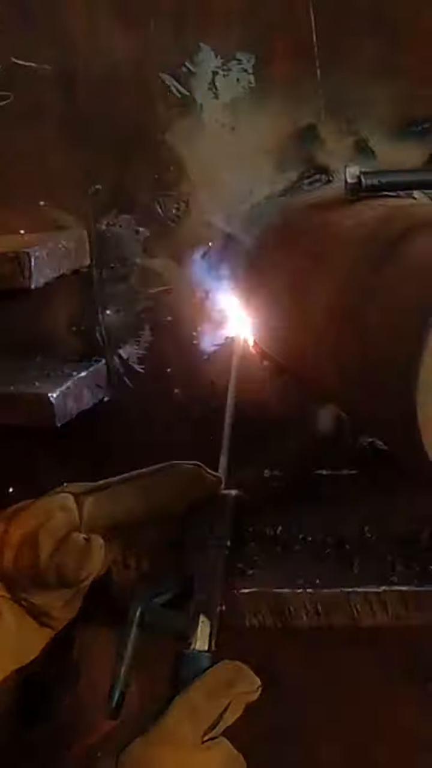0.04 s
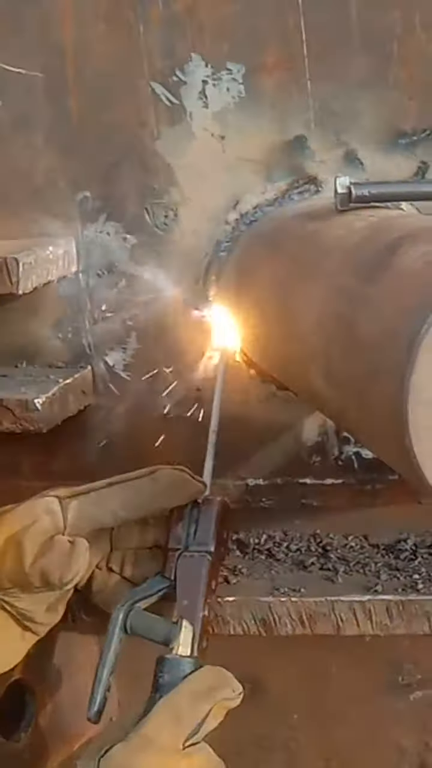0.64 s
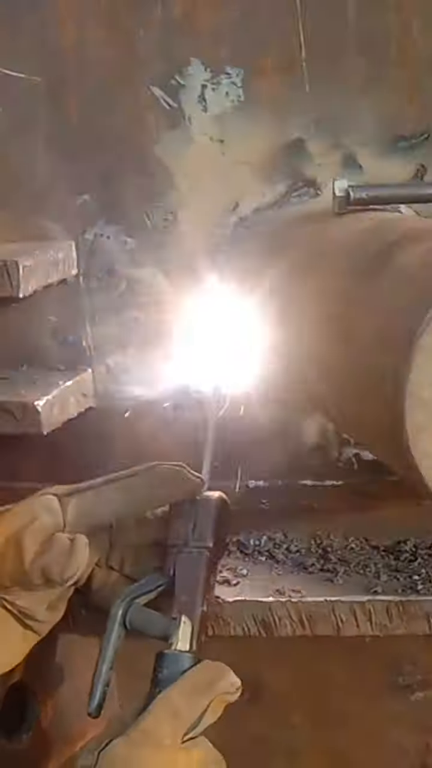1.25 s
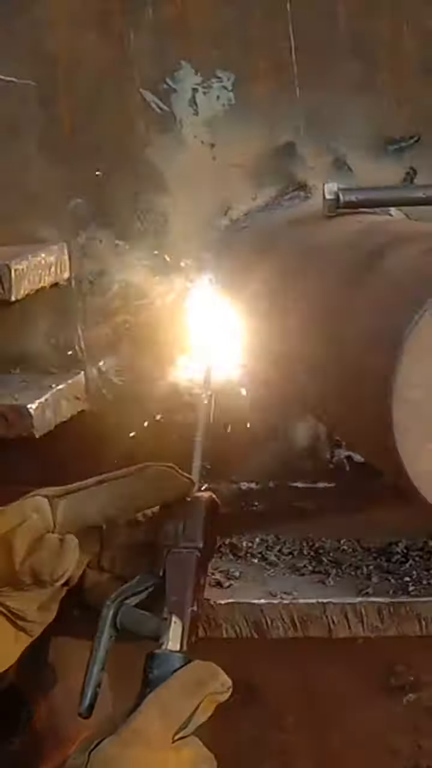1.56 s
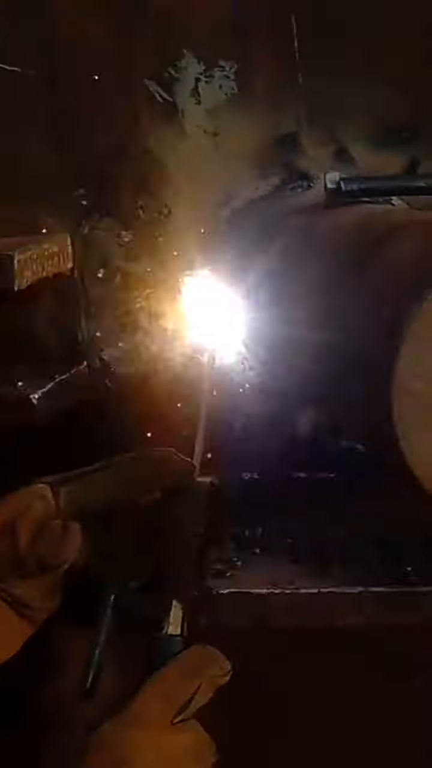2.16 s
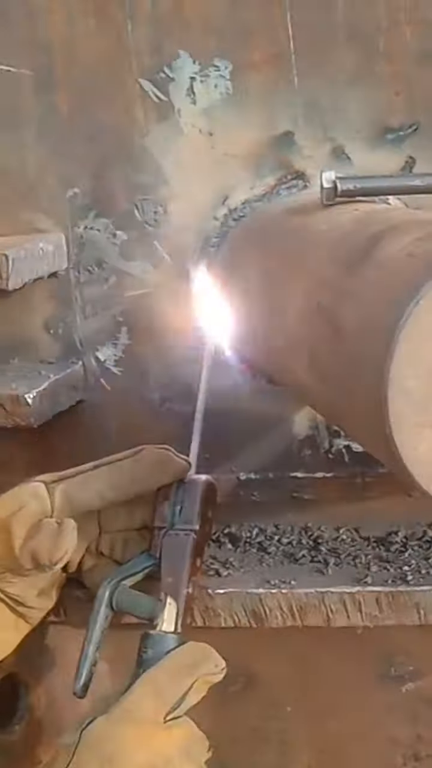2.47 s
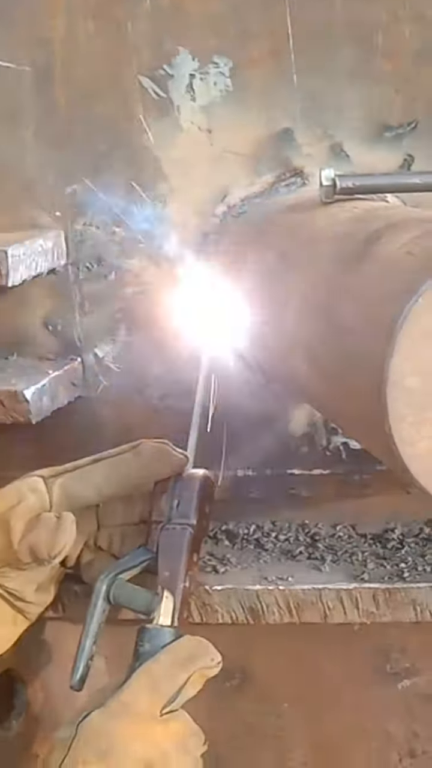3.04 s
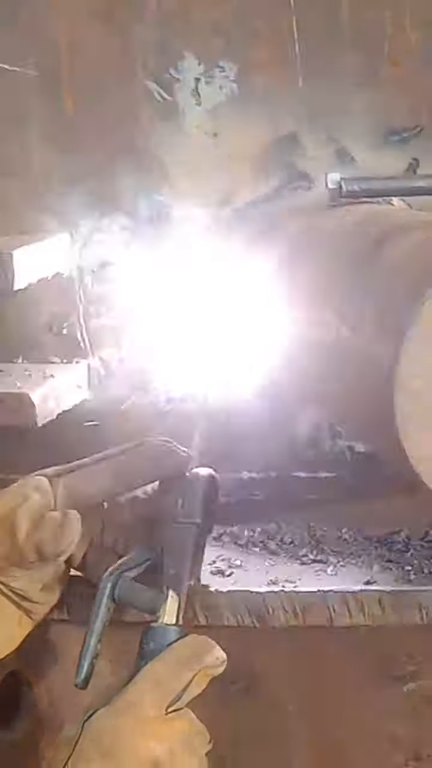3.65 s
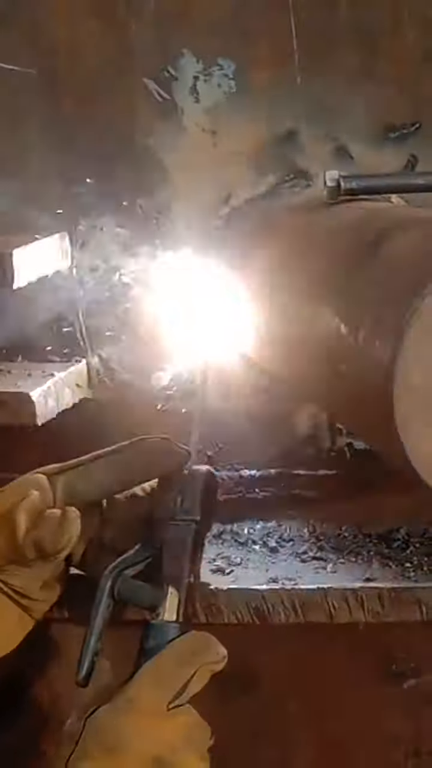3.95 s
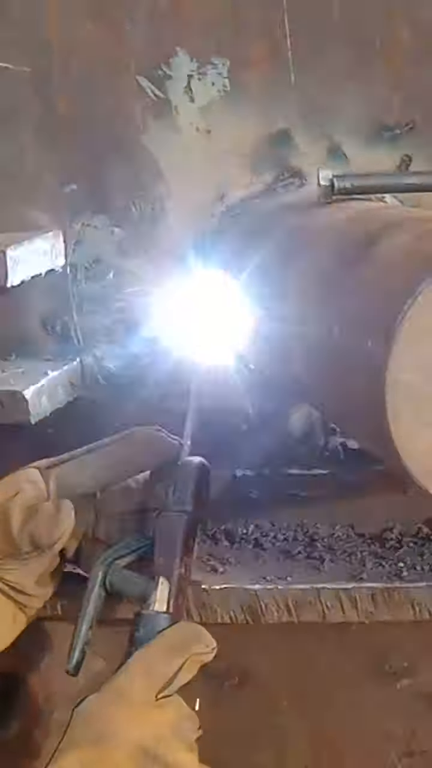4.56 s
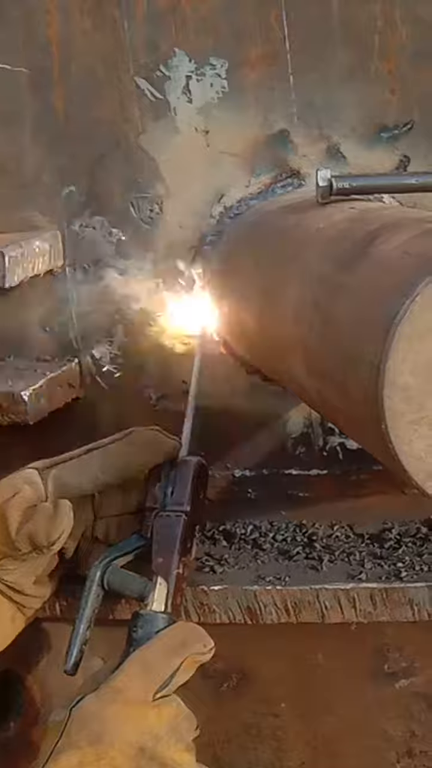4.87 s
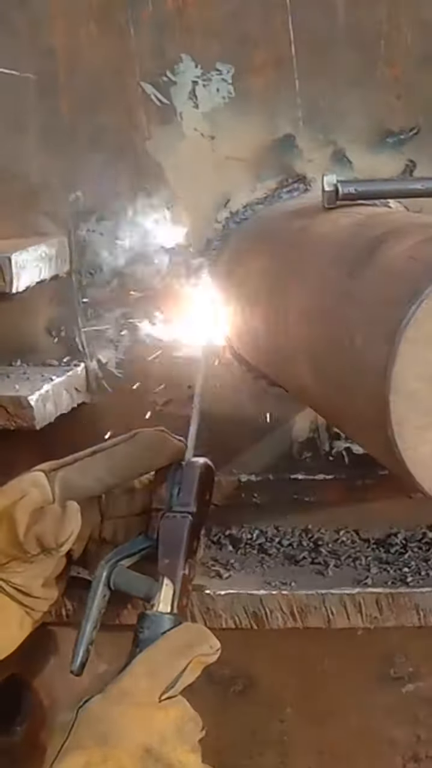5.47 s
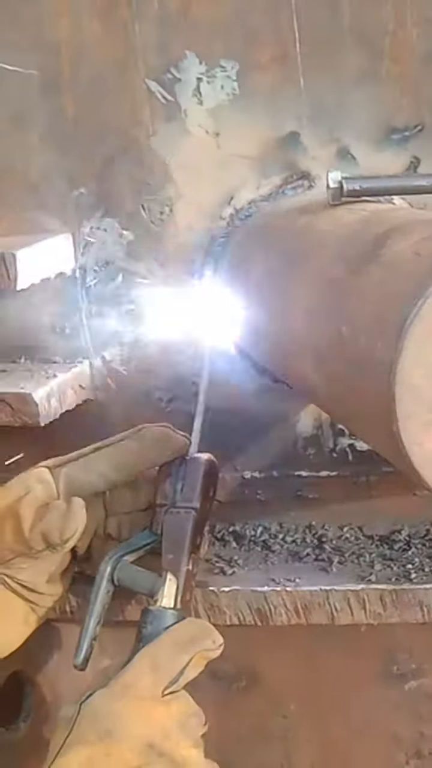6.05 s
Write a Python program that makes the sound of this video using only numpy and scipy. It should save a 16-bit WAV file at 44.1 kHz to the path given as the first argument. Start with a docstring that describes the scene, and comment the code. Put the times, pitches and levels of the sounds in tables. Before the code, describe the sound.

A stick welding arc burns on a steel pipe close to the microphone in a workshop. It hisses and crackles throughout, with a high fluttering whine, a thinner whistle below it and a faint ring from the steel. The sound dips and builds back up several times a second. Molten droplets snap sharply at irregular moments, joined by a few dull pops and soft low puffs of air.

```python
"""A hiss with a high whine, a thin whistle and crackling sparks: stick welding on a steel pipe, close by.
Turbulent gas from the electrode makes the hiss and rings the steelwork, while puffs of air rumble low.
Metal droplets short the gap and choke the arc, which then builds up again.
The droplets burst with sharp snaps, and a few bursts of spatter pop dully."""
import sys
import numpy as np
from scipy import signal
from scipy.fft import rfft, irfft, next_fast_len
from scipy.io import wavfile
from scipy.ndimage import uniform_filter1d

SR = 44100
rng = np.random.default_rng(int(sys.argv[2]) if len(sys.argv) > 2 else 0)


def master_out(mix):
    """Clip the mix to full scale and print it as 16-bit PCM to the path in sys.argv[1]."""
    frames = np.transpose(np.atleast_2d(mix))
    ceiling = np.clip(frames, -1, 1)
    pcm = np.round(ceiling * 32767).astype(np.int16)
    wavfile.write(sys.argv[1], SR, pcm)


N = 278271
TIME = np.arange(N) / SR


def undb(db):
    """Decibels to gain."""
    return 10 ** (np.asarray(db) / 20)


def unit(x, lo_hz=0, hi_hz=SR):
    """Scale x so that the given band has rms 1."""
    spectrum = rfft(x, next_fast_len(N, real=True))
    hz = np.linspace(0, SR / 2, len(spectrum))
    band = spectrum[(hz >= lo_hz) & (hz <= hi_hz)]
    return x / np.sqrt(np.sum(np.abs(band) ** 2) / (len(spectrum) * N))


def wander(rate):
    """Smooth random modulation with spread 1, changing about rate times a second."""
    span = max(int(SR / rate), 1)
    drift = uniform_filter1d(uniform_filter1d(rng.standard_normal(N), span), span)
    return drift / np.std(drift)


def response(points, size=4096):
    """Minimum-phase impulse response of an EQ curve of (Hz, dB) points."""
    hz, db = np.transpose(points)
    bins_hz = np.maximum(np.arange(size // 2 + 1) * SR / size, 1)
    gain = undb(np.interp(np.log(bins_hz), np.log(hz), db))
    cepstrum = irfft(np.log(gain))
    cepstrum[1:size // 2] *= 2
    cepstrum[size // 2 + 1:] = 0
    return irfft(np.exp(rfft(cepstrum)))


def colour(x, points):
    """Run x through an EQ curve."""
    return signal.fftconvolve(x, response(points))[:N]


def resonate(x, hz, width_hz):
    """One resonance, gain 1 at its centre."""
    return signal.lfilter(*signal.iirpeak(hz, hz / width_hz, fs=SR), x)


def sing(hz, width_hz, steady):
    """A narrow resonance blown by turbulence; steady (0 to 1) compresses its swells."""
    turbulence = rng.standard_normal(N) + 1j * rng.standard_normal(N)
    swells = signal.sosfilt(signal.butter(2, width_hz / 2, fs=SR, output="sos"), turbulence)
    swells /= np.hypot(np.abs(swells), 0.033 * np.std(swells)) ** steady
    carrier = np.exp(2j * np.pi * np.cumsum(hz * np.ones(N)) / SR)
    return unit(np.real(swells * carrier))


# The arc's burns, from one short circuit to the next. Each row: start in seconds, build-up in seconds,
# full relative levels of hiss, whine and crackle in dB, then how far each ducks in dB (negative lifts).
ARC_BURNS = [(0.0, 0.19, -29.5, -21, -40, 4.5, 9.5, 5.5), (0.504, .05, -33.5, -32, -36.5, 2, -6, 1),
             (0.603, 0.081, -33.5, -28.5, -35.5, 3.5, 7.5, 3), (0.823, 0.11, -24.5, -24.5, -34, 12, 6, 7.5),
             (1.001, 0.1, -24, -20.5, -36.5, 14, 10, 19), (1.301, 0.063, -30.5, -27, -37.5, 5.5, 4, -3.5),
             (1.42, 0.054, -32, -26.5, -38.5, 7.5, 15, 4), (1.762, 0.081, -30.5, -24.5, -37, 8.5, 10, 14),
             (1.965, 0.074, -28.5, -21, -36.5, 3, 6, 6.5), (2.305, 0.075, -26, -24, -36.5, 5.5, -2, 6),
             (2.613, 0.12, -28.5, -23.5, -39, 12.5, 14, 6.5), (2.84, 0.033, -35.5, -27.5, -41, -1, 4, 4),
             (2.901, .16, -26.5, -25.5, -34.5, 11.5, 12.5, 9), (3.202, 0.038, -34.5, -28, -42, 8.5, 14, 4),
             (3.262, 0.063, -34.5, -28, -40.5, 5, 18, 5), (3.372, 0.1, -31, -28, -40, 9, 8, 2.5),
             (3.539, 0.062, -26.5, -26.5, -34, 9, 8, 7.5), (3.77, .08, -26.5, -19, -30, -1.5, 2, 0),
             (4.06, 0.044, -27, -22.5, -32, 3.5, 7, -1), (4.163, .08, -34, -31, -40, 8, -2, 4.5),
             (4.302, 0.2, -26, -21, -34.5, 13, 12, 9), (4.659, 0.15, -29.5, -25, -34, 6, 7.5, 8.5),
             (5.082, .03, -33, -26, -35.5, 2, 1, 0), (5.117, 0.13, -25.5, -24, -37.5, 11.5, 7.5, 16.5),
             (5.44, 0.072, -34.5, -29, -37, 6.5, 7, 6.5), (5.763, .11, -27, -23.5, -32.5, 13.5, 12, 12),
             (5.984, 0.089, -32.5, -26, -43, 6, 9.5, 8.5)]


def arc_envelopes(choke_s=0.0075, build_shape=2.6, unrest_db=0.61):
    """A droplet shorts and chokes the arc, then it rebuilds: hiss, whine and crackle envelopes in dB."""
    rows = np.array(ARC_BURNS)
    current = np.maximum(np.searchsorted(rows[:, 0], TIME, side="right") - 1, 0)
    burn = rows[current].T
    start, build_s, full_db, duck_db = burn[0], burn[1], burn[2:5], burn[5:]
    choked = np.exp(-(np.abs(TIME - start) / build_s) ** build_shape)
    levels_db = uniform_filter1d(full_db - duck_db * choked, int(choke_s * SR), axis=1)
    return levels_db + unrest_db * wander(23)


# The tone of the gas jet. Each row: frequency in Hz, EQ gain in dB.
HISS_EQ = [(40, -31), (130, -7.5), (260, -6.5), (430, -1.5), (680, -3.5), (1050, 2.5), (1900, -2.5),
           (2600, -5), (3350, 4), (4050, -6), (5350, 8), (6300, 6.5), (8300, -16), (15500, -14.5)]
# The ring of the steelwork. Each row: frequency in Hz, width in Hz, send level in dB.
STEEL_MODES = [(327.5, 25.7, 15), (524, 65, 5.5), (776.5, 4.4, 1.5), (1593, 22, 2), (1880, 11, -11),
               (2130, 6.6, 11)]


def hiss(hiss_db, flutter_db=0.93, gain_db=-2):
    """Turbulent gas from the electrode tip flutters and rings the steelwork."""
    gas = colour(rng.standard_normal(N) * undb(flutter_db * wander(124)), HISS_EQ)
    steel = sum(undb(db) * resonate(gas, hz, width) for hz, width, db in STEEL_MODES)
    return unit(gas + steel, 400, 4800) * undb(hiss_db + gain_db)


# The whine's two close modes. Each row: pitch in Hz, width in Hz, relative level in dB.
WHINE_MODES = [(5485, 20, 0), (5338, 16, -15)]


def whine(whine_db, flutter_db=3.0, buzz_db=3.5, octave_db=-33):
    """The arc's high whine: two modes and a faint octave, fluttering with the flame."""
    tone = sum(undb(db) * sing(hz, width, steady=0.8) for hz, width, db in WHINE_MODES)
    octave = unit(resonate(tone ** 2, 2 * WHINE_MODES[0][0], width_hz=400))
    flicker_db = flutter_db * np.clip(wander(110), -2, 1.3) + buzz_db * wander(450)
    return (tone + undb(octave_db) * octave) * undb(whine_db + flicker_db)


# The whistle's glide. Each row: time in seconds, pitch in Hz, relative level in dB.
WHISTLE_GLIDE = [(0, 3082, -14.5), (.4, 3080, -14), (1.2, 3095, -22.5), (1.8, 3060, -16.5),
                 (2.45, 3120, -13), (2.8, 3175, -18.5), (4.0, 3145, -15.5), (4.6, 3150, -18),
                 (5.3, 3140, -17), (6.3, 3135, -16)]


def whistle(arc_db, flutter_db=4.0, gain_db=3):
    """A thin whistle below the whine, its pitch drifting as the electrode moves."""
    times, pitches, levels = np.transpose(WHISTLE_GLIDE)
    tone = sing(np.interp(TIME, times, pitches), width_hz=16, steady=0.6)
    level_db = arc_db + np.interp(TIME, times, levels) + gain_db
    return tone * undb(level_db + flutter_db * wander(94))


# Early reflections off pipe, plates and bench. Each row: delay in seconds, linear gain.
STEEL_ECHOES = [(.00105, 0.095), (.0019, 0.2), (.0035, .12), (.0055, 0.057)]


def reflect(x):
    """Nearby steel returns each click a few milliseconds later, turning it metallic."""
    return x + sum(gain * np.pad(x, (int(s * SR), 0))[:N] for s, gain in STEEL_ECHOES)


# The tone of one spark. Each row: frequency in Hz, EQ gain in dB.
SPARK_EQ = [(100, -17), (1000, -2), (2500, -6), (3200, 8.5), (4100, -11), (5450, 21), (5850, 13),
            (6500, 15), (7600, 6), (8800, 1.5), (12000, 0.5), (14000, 5.5), (15300, 10.5)]


def crackle(crackle_db, base_per_s=2200, crowding=0.43, spread_db=5.0, cluster_db=4.5):
    """Tiny sparks in clusters: a dense sizzle when the arc roars, sparser ticks when it is weak."""
    density = undb(2 * crowding * (crackle_db - np.mean(crackle_db)))
    strength = undb(spread_db * np.minimum(rng.exponential(size=N), 4.6))
    fires = rng.random(N) < base_per_s * density / SR
    sparks = fires * strength * rng.choice([-1, 1], N) / np.sqrt(density)
    clusters = undb(cluster_db * np.tanh(wander(140)))
    sizzle = reflect(colour(sparks * clusters, SPARK_EQ))
    return unit(sizzle, 8000, 15400) * undb(crackle_db)


# Puffs of air. Each row: centre in seconds, half length in seconds, level in dB, boom pitch in Hz.
AIR_PUFFS = [(0.048, .03, -30, 106), (0.572, 0.034, -40, 99), (0.966, 0.036, -35.5, 117),
             (1.16, 0.028, -36, 100), (1.269, .03, -32.5, 170), (2.403, 0.04, -36.5, 158),
             (3.17, 0.029, -40, 200), (3.837, 0.026, -37, 187), (4.28, .012, -35, 98),
             (5.181, 0.014, -28.5, 101), (5.23, .012, -32, 104), (5.324, 0.035, -35.5, 199),
             (5.596, 0.028, -29, 158), (5.87, .02, -33, 114), (5.953, .04, -30, 148),
             (6.195, 0.046, -24, 192)]


def puffs(boom_width_hz=47, boom_db=10, draught_db=-51, draught_hz=100, wander_db=3.5):
    """Moving air rumbles low: a faint draught, and puffs that swell and fade with a hollow boom."""
    rumble_eq = [(20, -37), (45, -11), (75, -2.5), (110, -1.5),
                 (200, -0.5), (320, -9.5), (520, -27), (1500, -46)]
    air = colour(rng.standard_normal(N), rumble_eq)
    draught = unit(air + resonate(air, draught_hz, boom_width_hz))
    out = draught * undb(draught_db + wander_db * wander(15))
    for centre_s, half_s, db, hz in AIR_PUFFS:
        puff = air + undb(boom_db) * resonate(air, hz, boom_width_hz)
        swell = undb(db) * np.exp(-((TIME - centre_s) / half_s) ** 2 / 2)
        running_rms = np.sqrt(uniform_filter1d(puff ** 2, size=1300))
        out += swell * puff / running_rms
    return out


# The loudest droplets snapping across the gap. Each row: start in seconds, relative level in dB.
DROPLET_SNAPS = [(0.1022, -8), (0.2954, -8), (0.5392, -10), (0.6293, -11), (0.6933, -8.5), (0.7294, -9),
                 (0.7456, -11), (0.7837, -4), (0.84, -6), (1.02, -9.5), (1.3187, -9), (1.447, -7),
                 (1.54, -1), (1.6297, -6.5), (1.7812, -3), (1.9558, -6), (2.3196, -4), (2.452, -2),
                 (2.486, -1), (2.5906, -5), (2.6118, -10), (2.641, -10.5), (2.841, -6.5), (2.8538, -6),
                 (2.8987, -2), (2.92, -3.5), (2.9682, -12), (3.224, -10.5), (3.422, -14), (3.5045, -7),
                 (3.562, -2.5), (3.6497, -5), (3.671, 1.5), (4.1556, -5), (4.177, -7.5), (4.3145, -8),
                 (4.422, -10), (4.682, -6), (4.8182, -5), (5.1091, -13.5), (5.134, -10), (5.4581, -6.5),
                 (5.5388, -12.5), (5.6555, -12), (5.7894, -11), (5.998, -6), (6.0234, -9), (6.1096, -10),
                 (6.266, -6)]
# The tone of a snap. Each row: frequency in Hz, EQ gain in dB.
SNAP_EQ = [(200, -14), (2400, -1), (3200, 4.5), (4200, 5), (5400, 16), (6400, 18.5), (7700, 4.5), (8700, 0),
           (11500, 0.5), (14000, 7.5), (15200, 3)]


def snaps(gain_db=4, spray=0.049, spray_s=0.0007, small_per_s=9, small_db=-18, scatter_db=2.5):
    """A droplet's bridge bursts with a click and a brief spray of sparks; small ones fall at random."""
    samples = 300
    out = np.zeros(N + samples)
    fade = np.exp(-np.arange(samples) / SR / spray_s)
    gaps, sizes = rng.random((120, 2)).T
    small_starts = np.cumsum(-np.log(1 - gaps)) / small_per_s
    small_levels = small_db + scatter_db * (2 * sizes - 1)
    for start_s, db in [*DROPLET_SNAPS, *zip(small_starts, small_levels)]:
        burst = spray * rng.standard_normal(samples) * fade
        burst[0] = 1  # the click
        start = min(int(start_s * SR), N)
        out[start:start + samples] += undb(db + gain_db) * burst
    return reflect(colour(out[:N], SNAP_EQ)) / np.abs(response(SNAP_EQ)).max()


# Bursts of spatter. Each row: time in seconds, relative pressure with its sign as polarity.
SPATTER_POPS = [(1.447, 0.21), (1.7811, -0.14), (2.9201, 0.23), (3.2237, -0.14), (3.2854, -0.45),
                (3.374, 0.39), (5.4578, -0.084), (5.5385, -0.21), (5.7892, -0.36), (6.0232, 0.14)]


def pops(rise_s=0.0001, fall_s=0.00009, push=0.69, push_s=0.0029, knock=0.87, gain_db=6):
    """Spatter pops with a pressure spike and a slower push of gas, swinging back through a bass cut."""
    out = np.zeros(N)
    for time_s, pressure in SPATTER_POPS:
        age = np.maximum(TIME - time_s + rise_s, 0)
        attack = 1 - np.exp(-age / rise_s)
        decay = np.exp(-age / fall_s) + push * np.exp(-age / push_s)
        out += pressure * attack * decay
    out += knock * resonate(out, hz=1150, width_hz=550)  # the corner between pipe and plate knocks
    bass_cut = signal.butter(2, 90, "high", fs=SR, output="sos")
    return undb(gain_db) * signal.sosfilt(bass_cut, out)


def scene(waver_db=0.66):
    """The mono mix: four arc layers ride the burn envelopes, joined by snaps, pops and puffs."""
    hiss_db, whine_db, crackle_db = arc_envelopes()
    tones = whine(whine_db + waver_db * wander(26)) + whistle((hiss_db + whine_db) / 2)
    arc = hiss(hiss_db) + tones + crackle(crackle_db)
    return (arc + snaps() + pops() + puffs())[None]


def record(dry, low_cut_hz=36, high_cut_hz=15620):
    """Soft clipping rounds the highest peaks; filters trim the deepest bass and the very top."""
    rounded = dry / (1 + dry ** 6) ** (1 / 6)
    lean = signal.sosfilt(signal.butter(2, low_cut_hz, "high", fs=SR, output="sos"), rounded)
    return signal.fftconvolve(lean, signal.firwin(161, high_cut_hz, fs=SR)[None], mode="same")


dry = scene()
out = record(dry)
master_out(out)
```